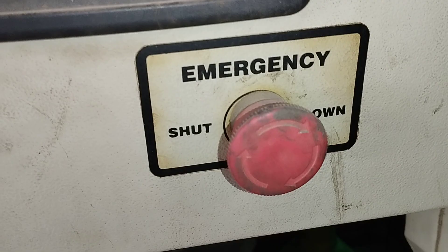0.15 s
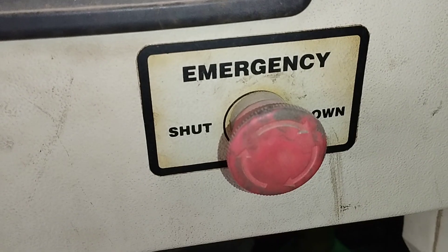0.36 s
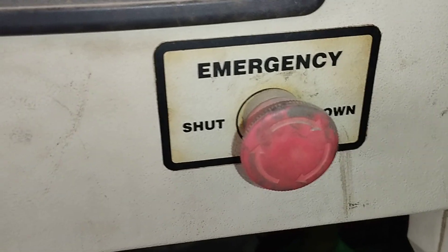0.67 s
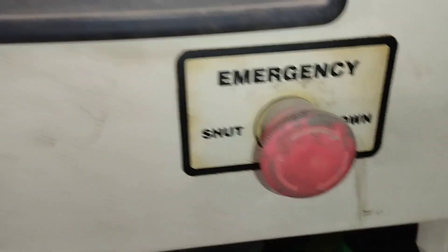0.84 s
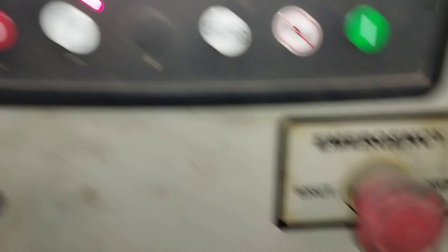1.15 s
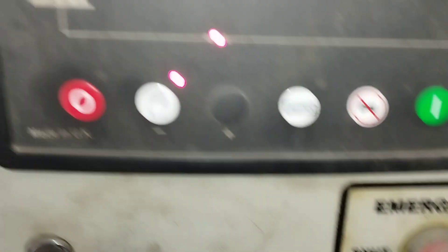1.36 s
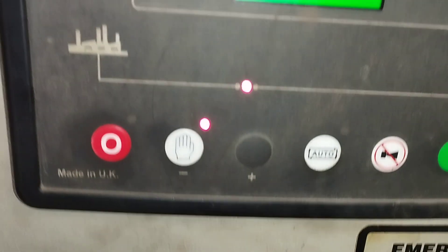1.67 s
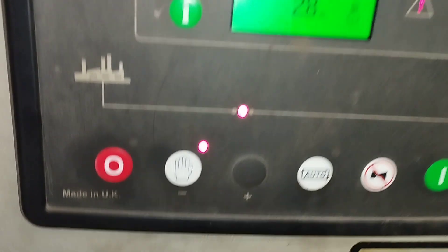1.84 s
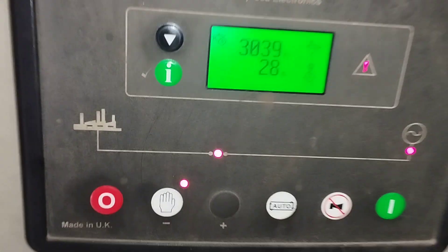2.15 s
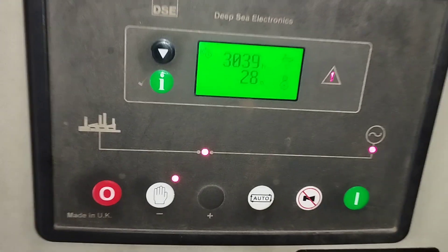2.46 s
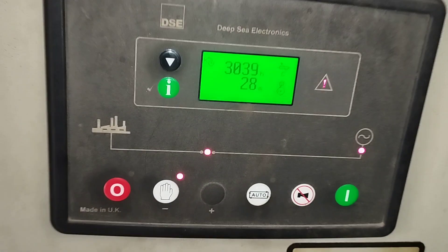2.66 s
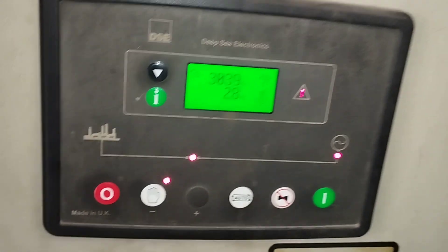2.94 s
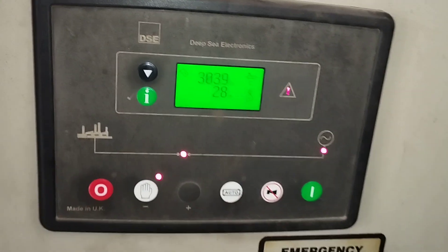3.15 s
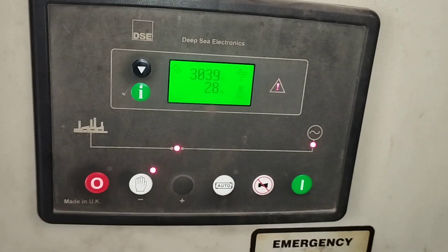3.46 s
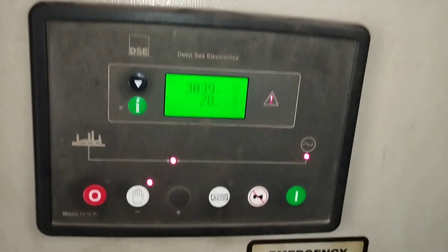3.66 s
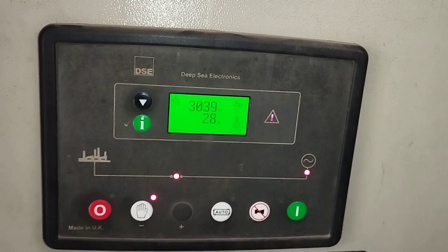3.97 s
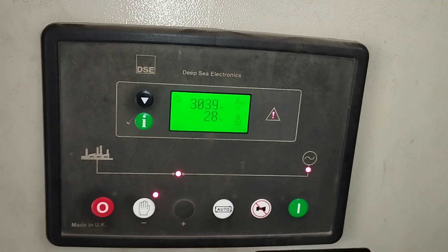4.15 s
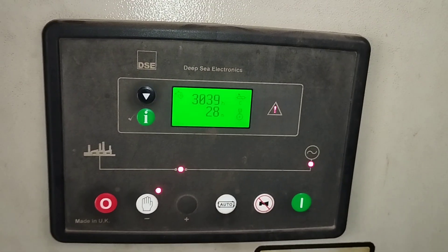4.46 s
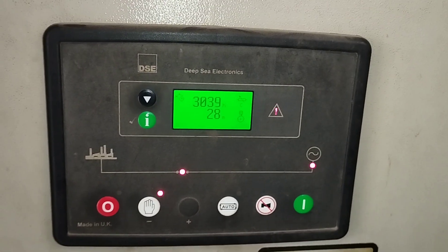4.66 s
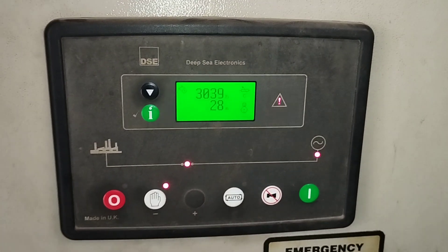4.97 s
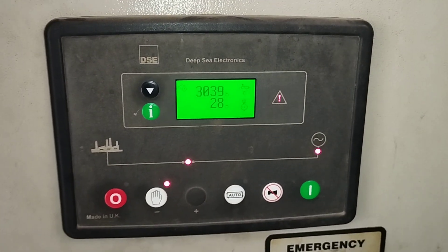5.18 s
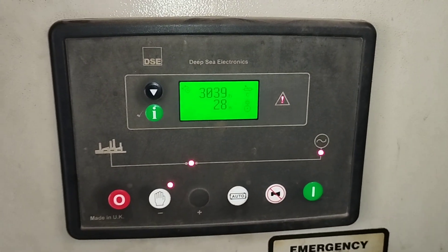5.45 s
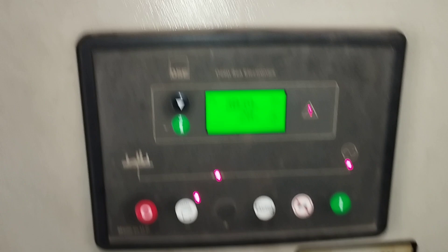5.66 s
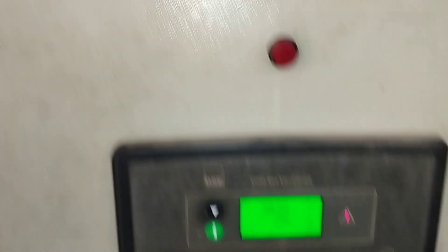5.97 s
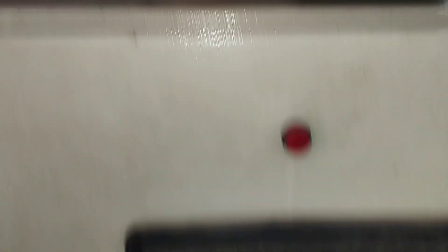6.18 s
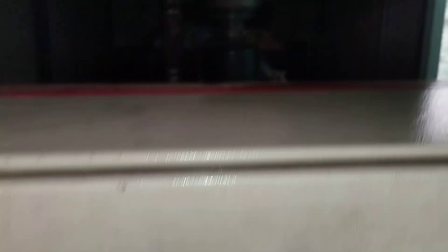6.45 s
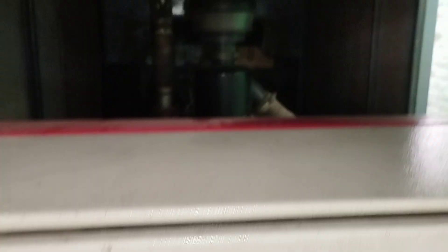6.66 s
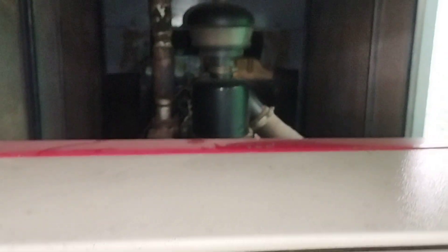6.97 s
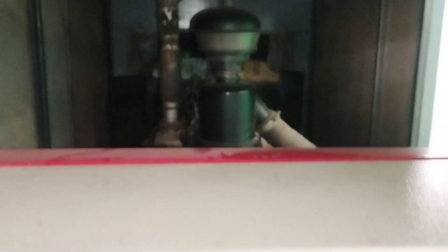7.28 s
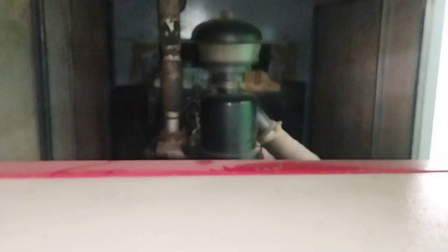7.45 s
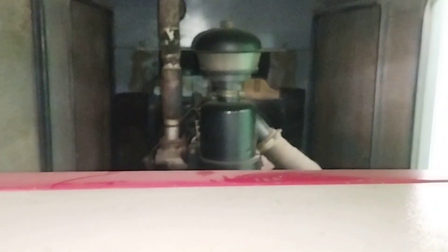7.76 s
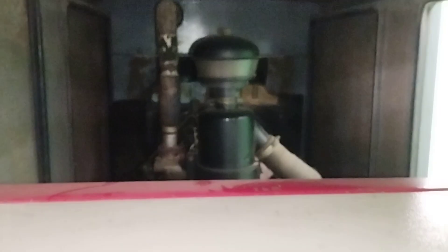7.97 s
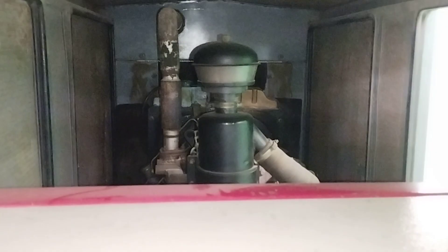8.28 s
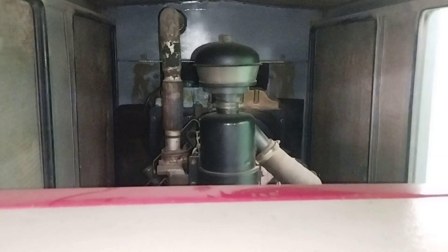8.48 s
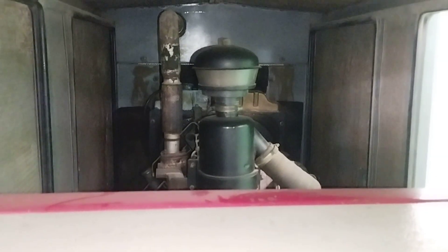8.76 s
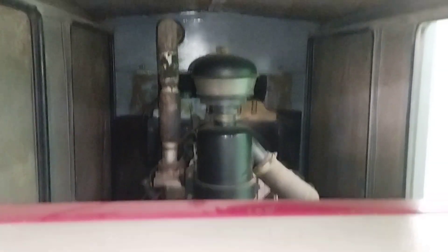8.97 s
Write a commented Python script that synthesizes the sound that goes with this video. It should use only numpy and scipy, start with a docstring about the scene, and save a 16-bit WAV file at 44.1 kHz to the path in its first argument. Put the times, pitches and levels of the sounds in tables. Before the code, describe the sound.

From 0 to about 9 seconds a three-cylinder diesel generator runs at steady governed speed, already going at the start and still running at the end. Its low drone throbs about thirteen times a second, with heavy steel-canopy boom pulsed by roughly thirty-nine firings a second. Over it lie sharp knocks, dense ringing block clatter, valve rattle and fine injector hiss toward the left. A slow-rolling fan tone and thin whine are faint. At first the phone is low by the wall, with crisp knocks; around 1.2-1.35 seconds it lifts to the panel and the colour changes. Speed sags barely audibly from 3.2 to 3.55, recovering gradually by 6.4. A loose cover clacks dully at 4.4. Around 6.0-6.25 the phone passes the hatch lip: rattle swells briefly, then stays more open and hissy, the hiss more central. Small uneven level swells continue throughout.

```python
"""A three-cylinder diesel generator runs at governed speed in its steel canopy, close to a hand-held phone.
Engine orders are summed cosines in step with one crankshaft; the canopy's boom is noise pulsed by the firings.
Knocks, valve rattle and injector hiss are part-repeating noise under envelopes of evenly spaced blows.
A fan tone, a thin whine and one clack of a loose cover join in; the speed sags once and recovers.
The phone moves from low on the wall up to the control panel, then to an open hatch above it."""
import sys
import numpy as np
from scipy import signal
from scipy.fft import rfft, irfft, next_fast_len
from scipy.io import wavfile
from scipy.ndimage import uniform_filter1d, minimum_filter1d, map_coordinates

SR = 44100
rng = np.random.default_rng(int(sys.argv[2]) if len(sys.argv) > 2 else 0)


def inscribe(sig):
    """Save sig as 16-bit PCM at rate SR to the path in sys.argv[1].

    A 1-D sig is mono; a 2-D sig holds one channel per row.
    Samples are clipped to [-1, 1] before scaling.
    """
    pcm = np.round(np.clip(np.atleast_2d(sig).T, -1, 1) * 32767)
    wavfile.write(sys.argv[1], SR, pcm.astype(np.int16))


N = 402191
T = np.arange(N) / SR

NOMINAL_RPM = 1544
MOVE_S = 0.16  # the phone's travel from one place to the next
# the three cylinders in firing order: knock_db, following_slap_db
CYLINDERS = [(0, 0), (0.5, -1), (-1.5, -6.5)]
# the six valves in closing order: blow_db
VALVE_BLOWS = [3.5, 3, 3.5, -2, 2, -5.5]
# where the phone is held, at the wall, panel and hatch:
# arrives_s, knock_db, rattle_db, injector_hiss_db, sharp_knocks_over_block_ring_db
PHONE_PLACES = [(0, 1.5, -10, -20, 4), (1.35, 2, -9, -19.5, 1.5), (6.15, 2, -8, -18, 2)]


def undb(db):
    """Decibels to gain."""
    return 10 ** (np.asarray(db) / 20)


def unit(x):
    """Scale a stereo pair so that the mean of its sides has rms 1."""
    return x / np.std(x.mean(axis=0))


def curves(table):
    """Each column of a table, joined by straight lines in time."""
    s, *columns = np.transpose(table)
    return [np.interp(T, s, c) for c in columns]


def bell(x, centre, width, db):
    """A smooth hump in dB."""
    return db * np.exp(-((x - centre) / width) ** 2)


def walk(rate):
    """Smooth chance with a spread near 1, through rate random points a second."""
    points = rng.standard_normal(1024)
    coarse = map_coordinates(points, [T[::64] * rate], order=3, mode="wrap")
    return coarse.repeat(64)[:N]


def colour(x, table):
    """Filter by a spectrum with one column, or one for each side."""
    hz, *columns = np.transpose(table)
    size = next_fast_len(N)
    f = np.maximum(np.fft.rfftfreq(size, 1 / SR), 1)
    db = np.array([np.interp(np.log(f), np.log(hz), c) for c in columns])
    # beyond the ends of the table it falls by 30 dB an octave
    octaves_outside = np.abs(np.log2(f / np.clip(f, hz[0], hz[-1])))
    gain = undb(db - 30 * octaves_outside)
    return irfft(rfft(x, size) * gain, size)[:, :N]


def ring(x, modes):
    """The sum of a few resonances."""
    out = 0
    for hz, width, db in modes:
        b, a = signal.iirpeak(hz, hz / width, SR)
        out = out + undb(db) * signal.lfilter(b, a, x)
    return out


def arrived(s):
    """Rises from 0 to 1 during the move that ends at s."""
    return np.clip((T - s) / MOVE_S + 1, 0, 1)


def presence():
    """Share of each place, one row each: steady while the phone stays, cross-fading during a move."""
    reached = [np.ones(N)] + [arrived(place[0]) for place in PHONE_PLACES[1:]] + [np.zeros(N)]
    return -np.diff(reached, axis=0)


def place_levels():
    """Each level column of the phone's places as a curve in time."""
    return np.transpose(PHONE_PLACES)[1:] @ presence()


def by_wall():
    """1 while the phone is low on the wall; drops as it lifts, then fades."""
    lifted_s = PHONE_PLACES[1][0]
    lingers, fade_s = .75, 1.0  # share of the wall's colour left after the move, and its decay time
    left_over = lingers * np.exp(-np.maximum(T - lifted_s, 0) / fade_s)
    return 1 - arrived(lifted_s) * (1 - left_over)


def standing():
    """Weight of each place's standing waves; those of the wall linger after the phone lifts."""
    wall, hatch = by_wall(), presence()[2]
    return np.array([wall, 1 - wall - hatch, hatch])


def blows(cycle, sizes_db, lag, decay, bed):
    """Envelope of evenly spaced blows over a steady bed; lag and decay are shares of their interval."""
    firing = cycle * len(sizes_db) - lag + len(sizes_db)
    index, age = firing.astype(int), firing % 1
    scatter_db = .9 * rng.standard_normal(1024)[index]
    size = undb(np.asarray(sizes_db)[index % len(sizes_db)] + scatter_db)
    blow = size * age / decay * np.exp(1 - age / decay)
    return np.sqrt(bed ** 2 + blow ** 2)


def strikes(cycle):
    """Envelope of the metal blows: each firing knocks, and a lighter slap follows."""
    knock_db, slap_db = np.transpose(CYLINDERS)
    knocks = blows(cycle, knock_db, lag=.28, decay=.12, bed=0)
    slaps = blows(cycle, slap_db, lag=.6, decay=.12, bed=0)
    return np.hypot(knocks, slaps)


def clatter(cycle, repeat, slip_ms):
    """Dense metal ringing: part comes back alike each cycle and changes slowly, the rest is fresh."""
    size = int(SR * 120 / NOMINAL_RPM)  # samples in a cycle
    place = cycle * size + slip_ms * SR / 1000 * walk(40)
    # eightfold oversampling lets the patterns slip by parts of a sample
    fine = signal.resample(rng.standard_normal((4, size)), 8 * size, axis=1)
    patterns = fine[:, (place * 8).astype(int) % (8 * size)]
    turn = .5 * T + 0.5 * walk(1.99)
    alike = patterns[:2] * np.cos(turn) + patterns[2:] * np.sin(turn)
    share = np.clip(repeat, 0, 1)
    return np.sqrt(share) * alike + np.sqrt(1 - share) * rng.standard_normal((2, N))


def flurries():
    """Gain of loose parts that chatter in short, uneven bunches."""
    gain = undb(1.0 * walk(45))  # depth in dB, random points a second
    return gain / np.sqrt(np.mean(gain ** 2))


def drone(cycle, flutter, port_radians, right_db, right_above_hz):
    """Engine orders that swell into one throb a cycle; standing waves weight them differently at each place."""
    # engine orders, before the common trim: multiple_of_cycle_rate, wall_db, panel_db, hatch_db
    order_table = [(2, -43.5, -43.5, -43.5), (3, -19.5, -21.0, -21.0), (6, -19.0, -19.0, -18.0),
                   (7, -26.0, -26.5, -25.5), (8, -38.5, -34.0, -33.0), (9, -24.5, -26.0, -30.5),
                   (10, -24.0, -24.0, -22.5), (11, -30.5, -28.0, -27.0), (12, -25.5, -26.0, -24.0),
                   (13, -27.5, -29.0, -29.5), (14, -33.0, -32.0, -33.0), (15, -19.0, -18.0, -19.5),
                   (16, -20.0, -17.0, -17.0), (17, -43.0, -42.0, -34.5), (18, -24.0, -20.0, -19.0),
                   (19, -35.0, -31.5, -35.0), (20, -34.5, -32.0, -33.5), (21, -24.5, -23.0, -24.5),
                   (22, -28.5, -27.5, -31.0), (23, -46.5, -38.5, -43.5), (24, -37.5, -34.5, -35.0),
                   (25, -46.0, -43.0, -39.5), (27, -38.0, -39.0, -45.0), (28, -40.0, -43.5, -43.0),
                   (29, -48.5, -51.0, -50.0), (30, -36.0, -42.0, -51.5), (32, -43.0, -45.5, -47.0),
                   (33, -49.5, -51.5, -45.0)]
    # the canopy holds higher notes back, so each throb rises in pitch: pitch_hz, lateness_cycles
    lateness_table = [(80, .6), (123, 1.45), (135, 1.7), (200, 1.73), (251, 2.0), (264, 2.25), (280, 2.12),
                      (310, 2.28), (341, 2.55), (354, 2.92), (368, 3.28)]
    # orders in the dips between the canopy's resonances come through inverted: multiple_of_cycle_rate
    notch_orders = (11, 17)
    trim_db = 0.58
    out, here = 0, standing()
    cycle_hz = NOMINAL_RPM / 120
    ports = np.array([[-.5], [.5]])  # left, right
    for k, *place_db in order_table:
        hz = k * cycle_hz
        # lateness is a group delay: it adds up from order to order
        steps_hz = (np.arange(int(k)) + .5) * cycle_hz
        late = np.interp(steps_hz, *np.transpose(lateness_table)).sum() + .5 * (k in notch_orders)
        swing_db = flutter * min(k, 20) * walk(18)
        # the two ports are slightly out of step, and short waves are louder at the right one
        sides = undb(ports * right_db * np.clip((hz - right_above_hz) / 50, 0, 1))
        level = undb(trim_db + np.array(place_db) @ here + swing_db)
        wave = np.cos(2 * np.pi * (k * cycle - late) - ports * port_radians)
        out = out - level * sides * np.sqrt(2) * wave
    return out


def boom(cycle, side_db):
    """Uneven combustion shakes the canopy at each firing; the bass is nearly alike at both ports."""
    # unsteady boom of the canopy: pitch_hz, level_db_per_hz
    boom_table = [(12, -61), (40, -56.5), (60, -52.5), (92, -44), (113, -42), (135, -46.5), (153, -33),
                  (168, -34), (181, -40.5), (205, -38.5), (222, -40.5), (250, -49.5), (280, -47),
                  (330, -55), (420, -59.5), (700, -67.5)]
    shove = blows(cycle, np.array(CYLINDERS)[:, 0], lag=0.095, decay=0.21, bed=1.0)
    shove /= np.sqrt(np.mean(shove ** 2))
    noise = rng.standard_normal((2, N)) * np.sqrt(SR / 2)  # power 1 per Hz
    mid, side = colour(shove * noise, boom_table)
    return mid + undb(side_db) * side * np.array([[1], [-1]])


def knock(cycle, strike_db):
    """Sharp knocks stand out of the ringing block, whose noise swells at each firing."""
    # block and covers, relative levels: pitch_hz, left_db_per_hz, right_db_per_hz
    block_table = [(298, -0.5, -22.5), (496, 0, -7), (580, -1.5, -1), (810, -4, -0.5), (965, -2, 4.5),
                   (1080, -1.5, -0.5), (1130, -3, 5.5), (1340, -4, 2.5), (1520, -10, -5), (2320, -7.5, -5),
                   (2560, -13, -11), (3500, -31, -30)]
    swell = blows(cycle, np.array(CYLINDERS)[:, 0], lag=0.36, decay=0.38, bed=.95)
    ringing = clatter(cycle, repeat=0.5, slip_ms=0.038) * swell * flurries()
    crisp = signal.butter(2, 960, "high", fs=SR, output="sos")
    sharp = clatter(cycle, repeat=0.45, slip_ms=0.042) * strikes(cycle) * undb(strike_db)
    x = ringing + signal.sosfilt(crisp, sharp)
    # long waves reach both ports nearly alike, the right one 0.16 ms later
    low = signal.sosfiltfilt(signal.butter(2, 1300, fs=SR, output="sos"), x)
    shared = np.array([low[0], np.interp(T - 0.16 / 1000, T, low[0])])
    return unit(colour(x - 0.81 * low + 0.69 * shared, block_table))


def rattle(cycle):
    """Valve gear chatters; the knocks come through it, most of all at the open hatch."""
    # valve gear, relative levels: pitch_hz, left_db_per_hz, right_db_per_hz
    valve_gear_table = [(1780, -19, -16.5), (2750, -1, 1.5), (3380, -1, 1.5), (3840, -5.5, -0.5),
                        (5100, -8.5, -8), (6810, -13.5, -14.5), (7590, -19.5, -30), (8950, -45.5, -46.5)]
    wall_knocks, hatch_knocks = .9, 1.5  # gains; the panel has the wall's
    chatter = blows(cycle, VALVE_BLOWS, lag=0.042, decay=0.57, bed=2.2)
    noise = clatter(cycle, repeat=0.59, slip_ms=0.022)
    knock_gain = wall_knocks + (hatch_knocks - wall_knocks) * presence()[2]
    x = noise * np.hypot(chatter, knock_gain * strikes(cycle))
    return unit(colour(x * flurries(), valve_gear_table))


def injectors(cycle, spit_db, spits_per_s):
    """Injector hiss and a tick from each valve, with stray tiny clicks."""
    # injector hiss, relative levels: pitch_hz, left_db_per_hz, right_db_per_hz
    hiss_table = [(7000, -20.5, -44), (8200, -15.5, -28.5), (8910, -5, -11), (10000, -4, -6),
                  (11000, -6.5, -15.5), (12600, 1, 2.5), (14300, 2, 1), (15700, -1, -4.5)]
    gate = blows(cycle, VALVE_BLOWS, lag=.1, decay=.2, bed=1.15)
    spit_gain = undb(spit_db + 3.5 * np.minimum(rng.exponential(size=N), 4))
    spits = (rng.random(N) < spits_per_s / SR) * spit_gain
    return unit(colour(clatter(cycle, repeat=.25, slip_ms=.012) * gate + spits, hiss_table))


def cavity(x):
    """The canopy's peaks and hollows colour the metal noise differently at each place."""
    # peaks and hollows, before the 0.97 scaling: pitch_hz, half_width_hz, wall_db, panel_db, hatch_db
    cavity_table = [(382, 45, 4.5, 0.5, 2.5), (437, 41, -2, -1.5, 4.5), (490, 34, -2, -3.5, -4.5),
                    (650, 55, 3.5, 0, 1.5), (817, 30, -4, -5.5, 3), (923, 29, 2, -1, -4.5),
                    (970, 54, 2, 0, 1), (1200, 92, -1, 0, -1), (1330, 65, 2.5, 0, 2.5),
                    (1520, 93, 2.5, 0, 4), (1780, 95, -0.5, 0, -2), (1940, 130, 3.5, 1, 0),
                    (2830, 58, -4, 4, 2.5), (3530, 120, -0.5, -2, 1.5), (4180, 310, 3, 2, 1.5)]
    size = next_fast_len(N)
    f, spectrum, out = np.fft.rfftfreq(size, 1 / SR), rfft(x, size), 0
    hz, width, *place_db = np.transpose(cavity_table)
    humps = bell(f, hz[:, None], width[:, None], 0.97)
    for db, share in zip(place_db, standing()):
        out = out + share * irfft(spectrum * undb(db @ humps), size)[:, :N]
    return out


def fan(cycle, wander_radians):
    """The blade tone of the belt-driven fan lies just under an engine order and beats with it in a slow roll."""
    # blade tone at the wall, panel and hatch: level_db
    fan_levels = [-37, -32, -30]
    level = undb(np.array(fan_levels) @ standing())
    phase = 2 * np.pi * 17.82 * cycle + wander_radians * walk(5.6)  # 17.82 times the cycle rate
    return level * np.sqrt(2) * np.cos(phase)


def whine(cycle, waver_db, wander_radians):
    """Thin tones geared to the crankshaft, slightly out of step at the two ports."""
    # steady whine: multiple_of_cycle_rate, wall_db, panel_db, hatch_db
    whine_table = [(31.58, -47, -51, -51), (41, -47, -49, -58), (42, -49, -56, -64), (45, -53, -57, -60),
                   (48, -49, -58, -62), (59, -60, -54, -60), (78, -48.5, -50, -56), (97, -54, -55, -54),
                   (155, -56, -55, -64)]
    out, here = 0, standing()
    for k, *place_db in whine_table:
        apart = wander_radians * walk(25) * np.array([[1], [-1]])
        level = undb(np.array(place_db) @ here + waver_db * walk(2.6))
        out = out + level * np.sqrt(2) * np.cos(2 * np.pi * k * cycle + apart)
    return out


def clack_and_bursts(decay_s):
    """A loose cover clacks once, dulled by the canopy; fainter bursts of the same ring follow at set times."""
    # one clack of a loose cover at 4.365 s; the other rows are fainter bursts of the same ring: # start_s,
    # level_db
    burst_table = [(4.365, -25), (5.875, -32), (6.876, -31), (7.031, -32), (7.574, -31)]
    # their ring, relative levels: pitch_hz, width_hz, level_db
    burst_modes = [(1330, 560, 12), (2100, 770, -15), (4200, 1200, -15)]
    push = sum(undb(db) * (T >= s) * np.exp(-np.abs(T - s) / decay_s) for s, db in burst_table)
    dull = signal.butter(4, 5000, fs=SR, output="sos")
    ringing = ring(rng.standard_normal((2, N)), burst_modes)
    return push * unit(signal.sosfilt(dull, ringing))


def scene():
    """All engine sources follow one crankshaft; a cycle is two turns."""
    # the speed sags once and the governor pulls it back: time_s, above_nominal_rpm
    speed_table = [(0, .75), (3.17, .75), (3.55, -6.45), (6.4, .75)]
    # metal noise, common to knock, rattle and hiss, before the place levels: time_s, level_db
    metal_table = [(0, -32), (1.0, -33), (1.14, -30.5), (1.27, -36), (1.4, -33), (1.7, -33.5), (1.9, -33.5),
                   (2.15, -35), (2.38, -31.5), (2.7, -34.5), (2.9, -32), (3.12, -36), (3.5, -33),
                   (3.64, -35), (3.82, -33), (4.05, -34.5), (4.3, -33), (4.5, -34), (4.76, -34.5),
                   (5.0, -31), (5.15, -35), (5.7, -33), (6.1, -34.5), (6.72, -32.5), (6.96, -34.5),
                   (7.15, -33.5), (7.55, -33), (7.95, -33.5), (8.5, -32), (9.1, -33)]
    # the hiss lies to the left, less so at the hatch: time_s, left_minus_right_db
    pan_table = [(0, 14), (5.95, 15), (6.28, 4), (7.55, 10), (8.1, 7), (9.1, 8)]
    cycle = np.cumsum(NOMINAL_RPM + curves(speed_table)[0]) / 120 / SR
    knock_db, rattle_db, hiss_db, strike_db = place_levels()
    metal_db, pan_db = curves(metal_table)[0], curves(pan_table)[0]

    low = drone(cycle, flutter=0.015, port_radians=0.049, right_db=4.0, right_above_hz=248)
    low = low + fan(cycle, wander_radians=0.11) + boom(cycle, side_db=-23)
    # the level of the whole sound swings; the low sounds follow 0.55 of it, in dB
    low = low * undb(0.55 * (metal_db - metal_db.mean()))

    sides = undb(np.array([pan_db, -pan_db]) / 2)
    sides /= np.sqrt(np.mean(sides ** 2, axis=0))
    hiss = injectors(cycle, spit_db=9.0, spits_per_s=30) * sides * undb(hiss_db)
    # rattle spills over the lip of the hatch as the phone goes by
    lip_db = bell(T, centre=6.23, width=.17, db=3.1)
    block = knock(cycle, strike_db) * undb(knock_db)
    metal = cavity(block + rattle(cycle) * undb(rattle_db + lip_db)) + hiss
    # a small random waver in level shared by all the metal noise
    metal *= undb(metal_db + .4 * walk(18))
    return low + metal + whine(cycle, waver_db=2.5, wander_radians=0.48) + clack_and_bursts(decay_s=0.012)


def record(dry):
    """The phone's limiter eases the highest crests; the top is cut at 15750 Hz."""
    size = int(.006 * SR)
    crest = np.maximum(np.abs(dry).max(axis=0), 1e-6)
    gain = minimum_filter1d(np.minimum(1, .94 / crest), 2 * size)
    limited = dry * uniform_filter1d(uniform_filter1d(gain, size), size)
    return signal.sosfilt(signal.ellip(10, .2, 80, 15750, fs=SR, output="sos"), limited)


dry = scene()
out = record(dry)
inscribe(out)
```